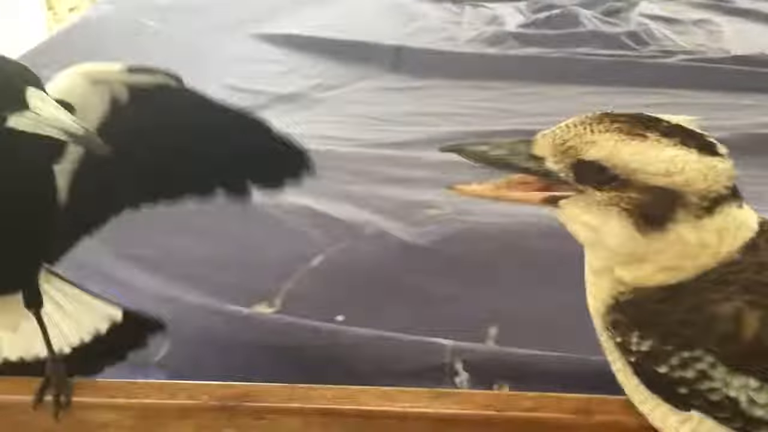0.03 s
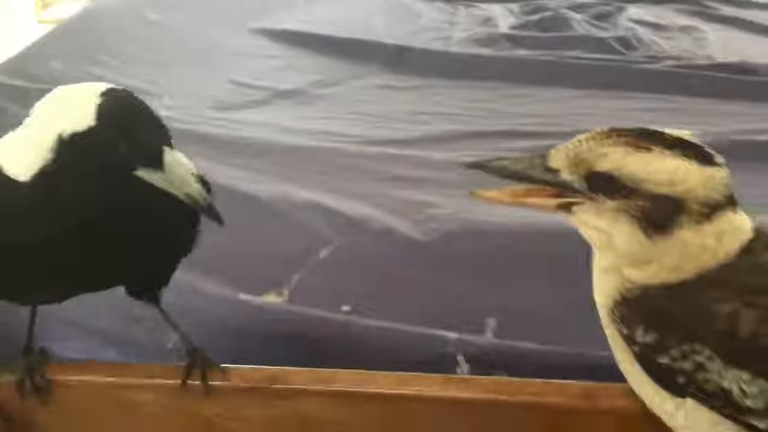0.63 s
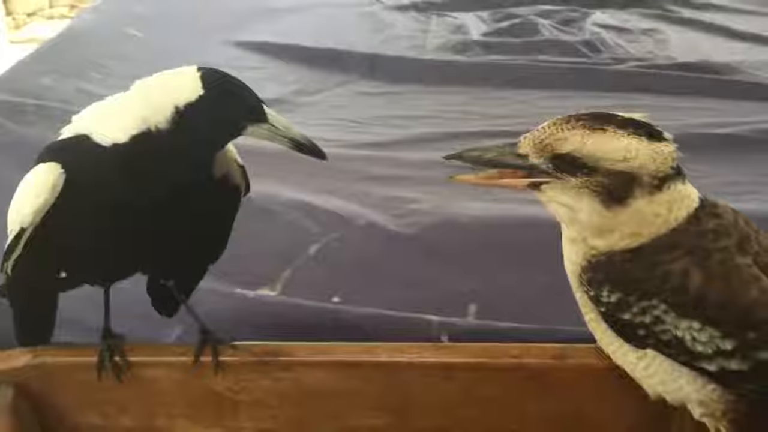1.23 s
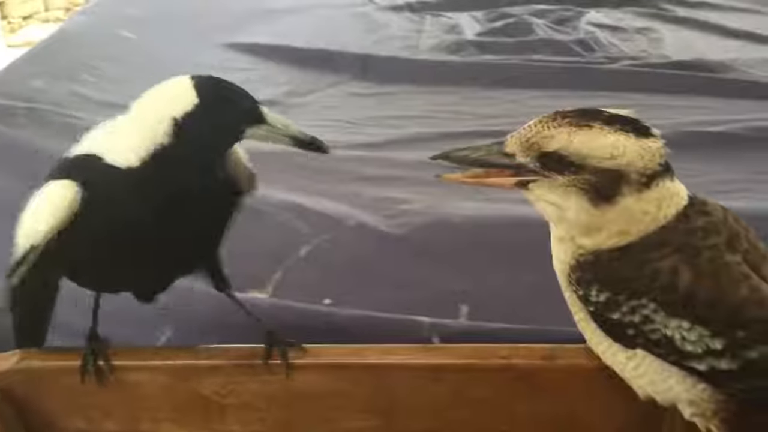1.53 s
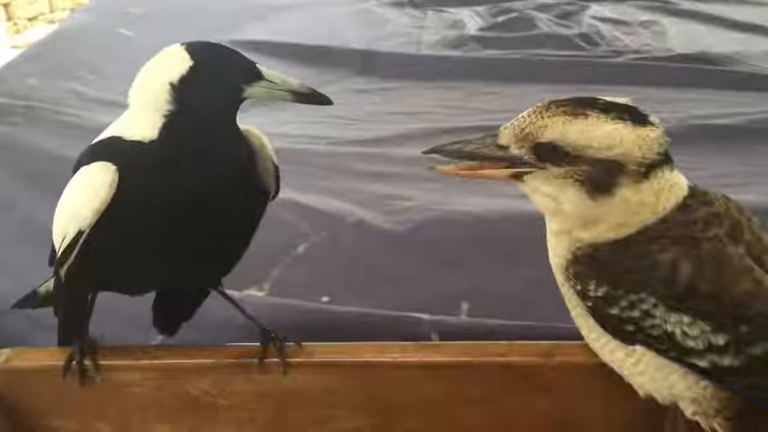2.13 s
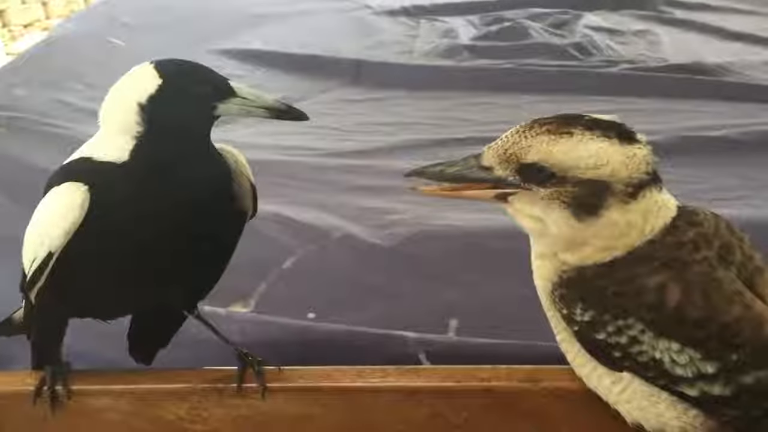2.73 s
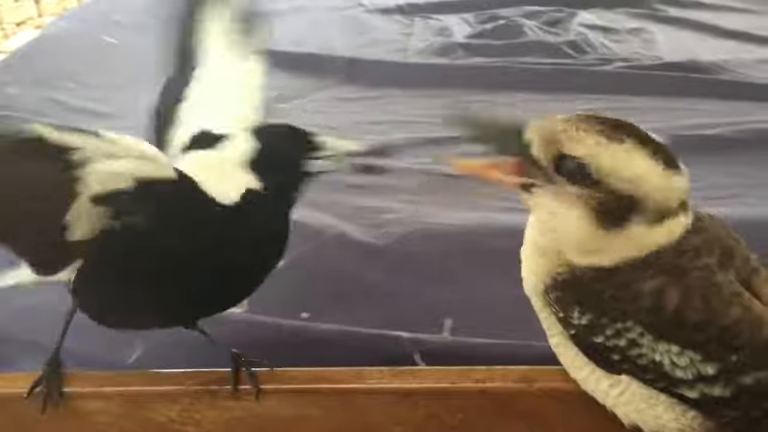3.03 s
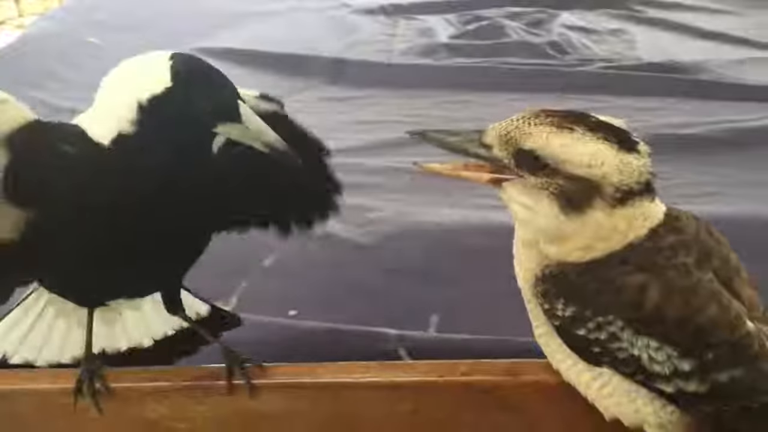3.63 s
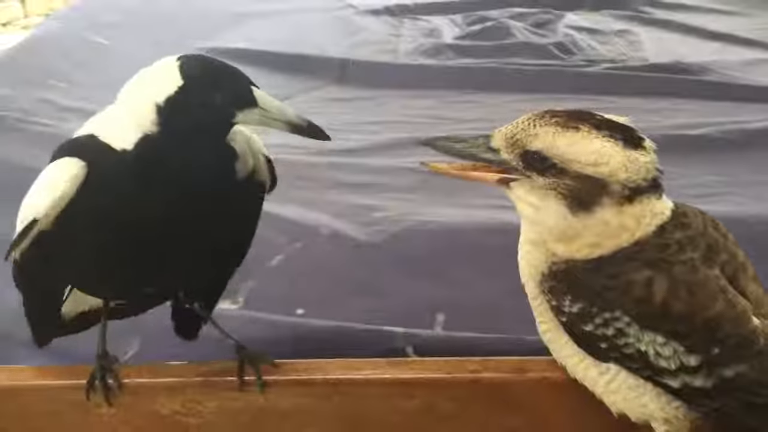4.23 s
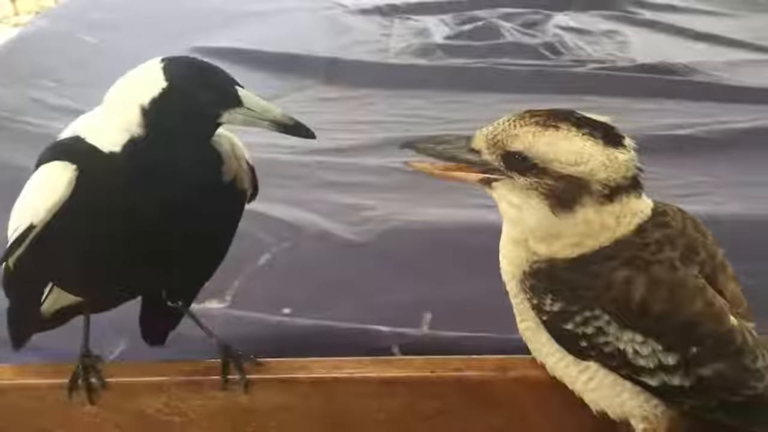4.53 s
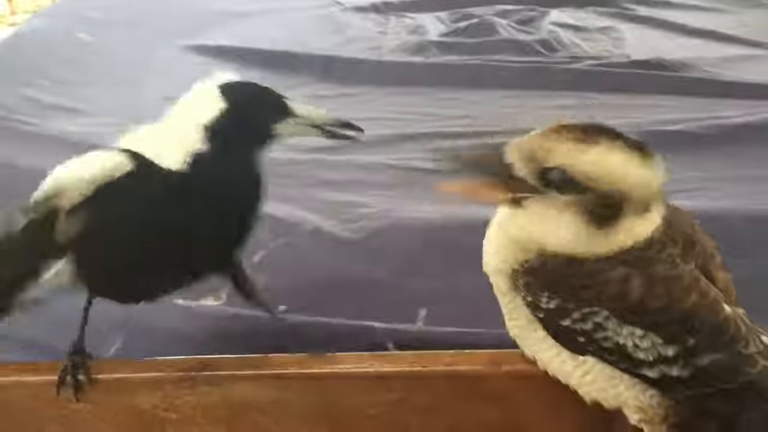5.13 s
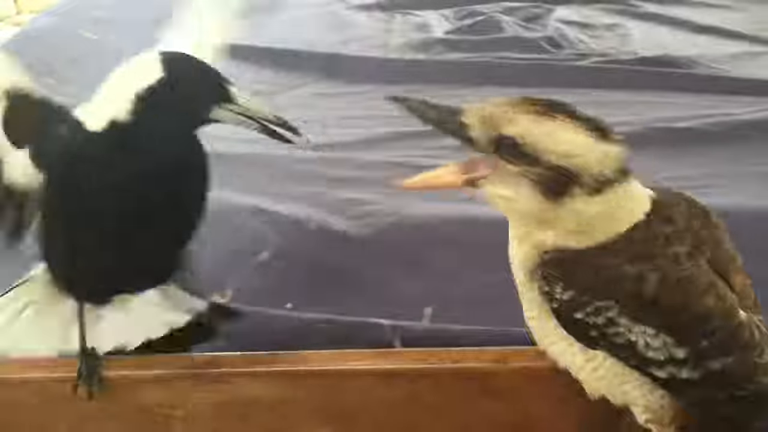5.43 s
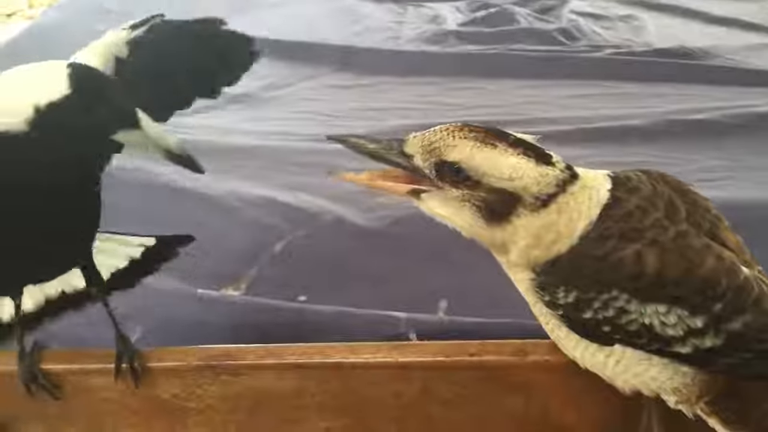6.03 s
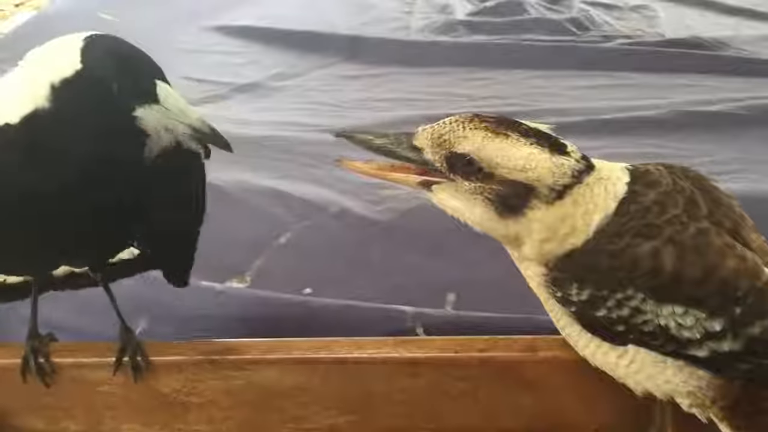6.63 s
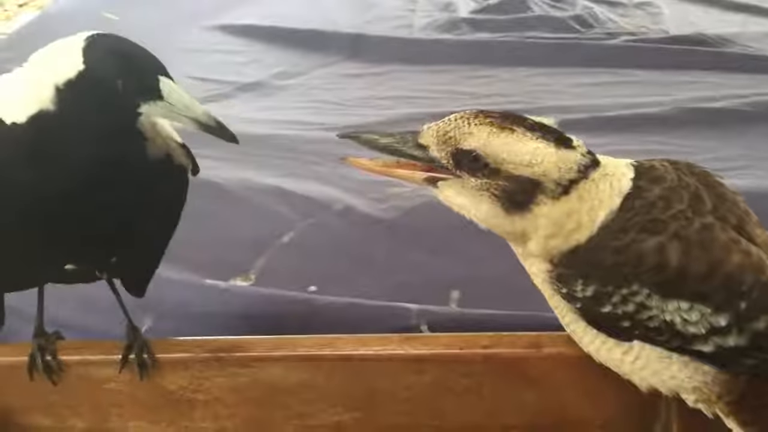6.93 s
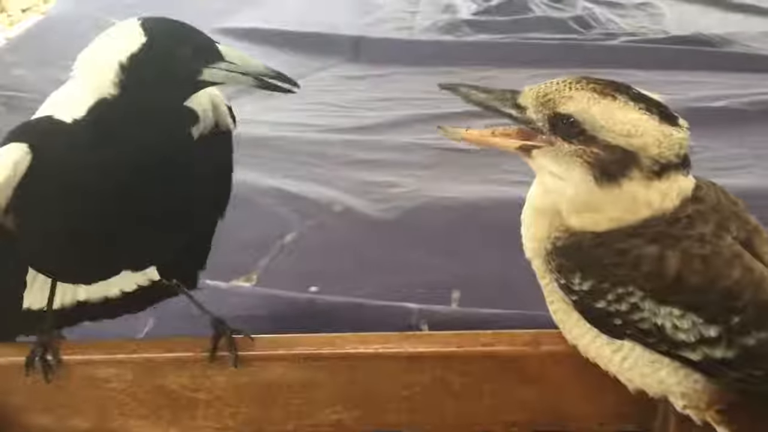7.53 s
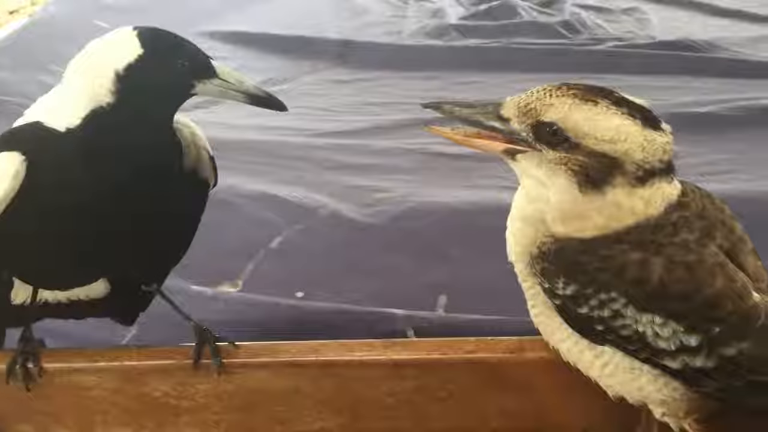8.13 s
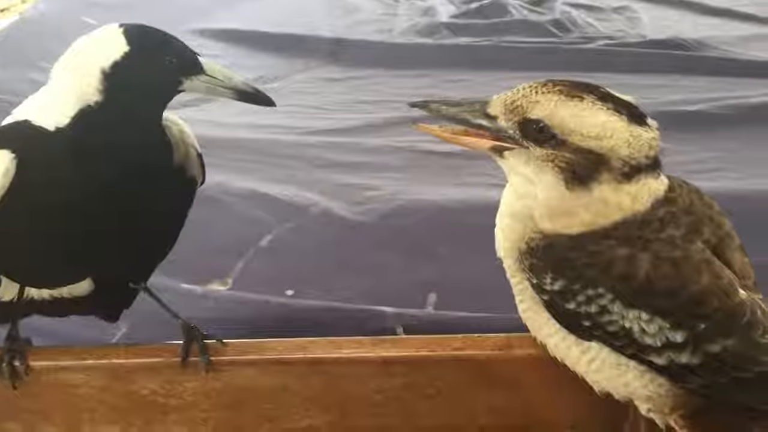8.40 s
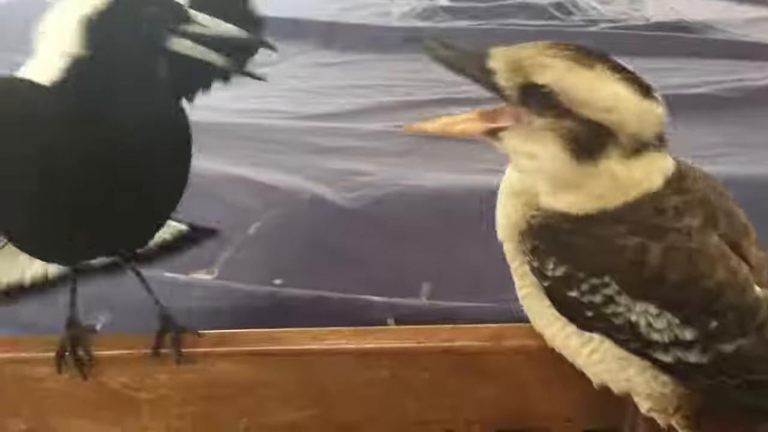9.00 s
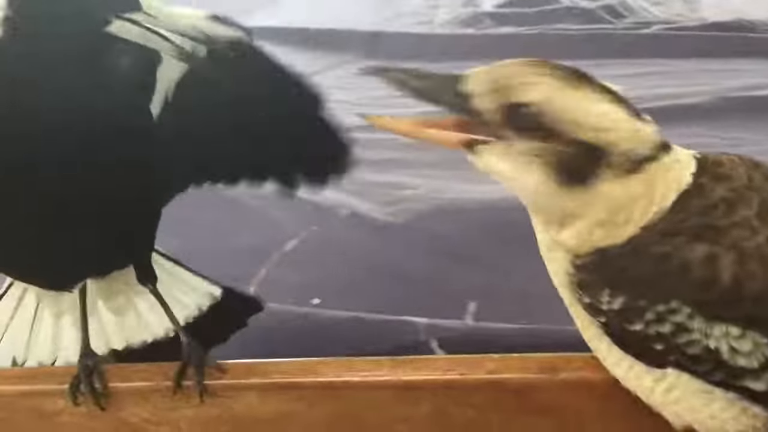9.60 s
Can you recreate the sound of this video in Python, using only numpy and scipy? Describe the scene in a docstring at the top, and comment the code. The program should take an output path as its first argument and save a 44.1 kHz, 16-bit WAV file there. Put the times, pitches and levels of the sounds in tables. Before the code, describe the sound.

A faint, low rumble of distant traffic runs throughout, with a far engine rising in pitch through four gears between about 1 and 9 seconds. Two tiny ticks of claws on wood come in the first second. Close by, a bird gives four short, harsh squawks at about 3.1, 5.2, 7.4 and 9.0 seconds, far louder than the background. Each lasts a fifth of a second: a fluttering buzz that cracks upward, then plunges. The third is slightly mellower. At 9.4 seconds a thin falling whistle follows, warbling at first and flicking up at its end. Light beak and claw clicks land near 3.5, 5.7, 7.3 and 8.9 seconds, with a few very faint wing rustles. A distant bird pipes softly three times. The near calls have a slight, short porch echo, and a low motor hum grows a little toward the end.

```python
"""Magpie squaring up to a kookaburra

On a wooden rail under a porch roof: four squawks (fluttering buzz, upward flip, hard plunge) and one
falling two-voiced whistle, made by syrinx membranes sounding through windpipe and beak. Beak and
claws tick, wings rustle. Far off, a bird pipes, traffic rumbles, an engine climbs through its gears."""
import sys
import numpy as np
from scipy import signal
from scipy.fft import rfft, irfft, next_fast_len
from scipy.io import wavfile
from scipy.ndimage import uniform_filter1d, map_coordinates

SR = 44100
rng = np.random.default_rng(int(sys.argv[2]) if len(sys.argv) > 2 else 0)


def waveform_to_disk(signal):
    """Save audio, clipped to [-1, 1], as 16-bit WAV at the path in sys.argv[1]."""
    frames = np.transpose(np.atleast_2d(signal))
    scaled = np.clip(frames, -1, 1) * 32767
    samples = np.round(scaled).astype(np.int16)
    wavfile.write(sys.argv[1], SR, samples)


N = 434826
TOP_HZ = 15720

# air in the throat: f/Hz, level/dB
BREATH = [(400, -42.5), (1000, -4.5), (2000, -15.5), (2750, 2), (4100, -5.5), (5100, -10), (6500, -4.5),
          (7400, -11), (9500, -12), (10400, -20.5), (11700, -14), (15500, -33.5)]
# feather and claw friction: f/Hz, level/dB
FRICTION = [(1000, -6), (3000, 4.5), (7000, 1.5), (13000, 0.5), (16000, -2.5)]
# one engine pull per gear: t/s, length/s, start rate/Hz, end rate/Hz, level/dB, swell/dB, tyre swell/dB
PULLS = [(0.9, 1.5, 21, 29, -55.5, 0, 0.5), (2.1, 1.7, 26.6, 33, -48.5, -2, 3),
         (4.4, 2.17, 21.2, 33.7, -45, 8, 6), (6.7, 2.3, 21.4, 29.2, -45, -5, 6)]


def amp(db):
    """Decibels to gain."""
    return 10 ** (np.asarray(db) / 20)


def unit(x):
    """Scale to rms 1."""
    return x / np.sqrt(np.mean(x ** 2) + 1e-20)


def along(points, hz):
    """Read (f/Hz, value) points on a log axis."""
    f, values = np.transpose(points)
    return np.interp(np.log(np.abs(hz) + 1), np.log(f + 1), values)


def wobble(rate_hz, size):
    """Smooth random curve, knots at rate_hz."""
    knots = rng.standard_normal(int(size * rate_hz / SR) + 4)
    return map_coordinates(knots, [np.arange(size) * rate_hz / SR], mode="nearest")


def edges(t, length_s, fade_s):
    """1 at both ends, falling to 0 within fade_s."""
    return np.maximum(1 - np.minimum(t, length_s - t) / fade_s, 0)


def phase_of(hz):
    """Running phase in radians."""
    return 2 * np.pi * np.cumsum(hz) / SR


def filtered(x, gain):
    """Apply gain(hz) to the spectrum."""
    size = next_fast_len(len(x) + 8192)
    return irfft(rfft(x, size) * gain(np.fft.rfftfreq(size, 1 / SR)), size)[:len(x)]


def noise(spectrum, size):
    """Coloured noise, rms 1."""
    return unit(filtered(rng.standard_normal(size), lambda hz: amp(along(spectrum, hz))))


def add(track, start_s, x):
    """Mix x in from start_s."""
    part = track[max(round(start_s * SR), 0):][:len(x)]
    part += x[:len(part)]


def syrinx(pitch_hz, slope_db, rasp_db, shimmer_db, purity_db, partials=14):
    """A membrane's overtones sweep through the throat's resonances; air hisses once a cycle."""
    # response of windpipe and open beak: f/Hz, gain/dB
    throat = [(300, -41.5), (560, -7.5), (1000, -6.5), (1600, 8), (2050, 1), (2520, -3), (2850, -18),
              (3400, -20.5), (4100, -11), (5000, -19.5), (6300, -16), (7300, -25.5), (9600, -22),
              (15000, -52.5)]
    size = len(pitch_hz)
    phase = phase_of(pitch_hz)
    k = np.arange(1, partials + 1)[:, None]
    tilt_db = slope_db * np.log2(np.maximum(k / 2, 1))
    gains = amp(along(throat, k * pitch_hz) + tilt_db) * (k * pitch_hz < TOP_HZ)
    gains[1:] *= amp(np.minimum(2200 - pitch_hz, 0) / 55 - purity_db)  # high register: thin overtones
    gains /= np.sqrt(np.sum(gains ** 2, axis=0) / 2)
    shimmer = amp(shimmer_db * np.minimum((k - 1) / 4, 1) * np.array([wobble(342, size) for _ in k]))
    tone = np.sum(gains * shimmer * np.sin(k * phase + rng.uniform(0, 2 * np.pi, k.shape)), axis=0)
    air_gain = amp(rasp_db)
    hiss = air_gain * noise(BREATH, size) * (1 + np.cos(phase) / 2)
    return (tone + hiss) / np.sqrt(1 + air_gain ** 2)


def squawk_gesture(attack_s, buzz_s, climb_s, low_hz, top_hz, ring_hz, fall_s,
                   buzz_db, swell_db, accent_db, plunge_db):
    """Pitch and level of a squawk: hold a low note, tighten to the top, catch, let go."""
    # membrane output, best with partial 1 or 2 on the windpipe resonance: f/Hz, gain/dB
    coupling = [(500, -27), (640, -7), (760, 0), (950, 1), (1100, -4), (1300, -4), (1600, -3.5), (1950, -1),
                (2100, -0.5), (2750, -13.5), (3300, -17.5)]
    turn_s, hold_s, plunge_s = .015, .007, .07
    bend_hz, break_hz, plunge_hz = 169.2, 2713, 2234
    catch_s = buzz_s + climb_s + turn_s
    t = np.arange(round((catch_s + plunge_s) * SR)) / SR
    since_s = np.maximum(t - catch_s, 0)
    stages = [t < buzz_s, t < catch_s]

    scoop_hz = 149.1 * np.exp(-t / .02)
    buzz_hz = low_hz + scoop_hz + bend_hz * np.exp(np.minimum(t - buzz_s, 0) / .013)
    flip_hz = np.interp(t, [buzz_s, buzz_s + climb_s, catch_s], [low_hz + bend_hz, top_hz, break_hz])
    # pitch sticks at the windpipe resonance until pulled past break_hz
    flip_hz = np.where(flip_hz < break_hz, np.minimum(flip_hz, ring_hz), flip_hz)
    fall_hz = np.where(since_s < hold_s, ring_hz, plunge_hz * np.exp(-since_s / fall_s))
    pitch_hz = np.select(stages, [buzz_hz, flip_hz], fall_hz)

    onset_db = 15 * np.maximum(1 - (t / attack_s) ** 2, 0)
    low_db = buzz_db + swell_db * t / buzz_s - onset_db + .8 * wobble(120, len(t))
    full_db = plunge_db + along(coupling, pitch_hz)
    climb_db = full_db - 5 * (pitch_hz < break_hz)
    catch_db = accent_db * np.exp(-(since_s / .009) ** 2)
    tear_db = 1.5 * (since_s > hold_s) * wobble(450, len(t))
    db = np.select(stages, [low_db, climb_db], full_db + catch_db + tear_db)
    return t, uniform_filter1d(pitch_hz, size=90), uniform_filter1d(db, size=70), ring_hz


def squawk(t, pitch_hz, db, ring_hz, mellow_db, flutter_hz=152, swing=.11, throb_db=4, crack_db=18):
    """A low note flutters, cracks up through a weak high register, then plunges at full force."""
    buzzing = np.clip((1600 - np.maximum.accumulate(pitch_hz)) / 350, 0, 1)
    rising = (1 - buzzing) * (t < t[np.argmax(pitch_hz)])
    cracked = np.clip((pitch_hz - 2200) / 600, 0, 1)  # the membrane loses its grip
    effort_db = np.clip(db + 18.5, -8, 5)  # harder push: brighter, harsher
    beat = phase_of(flutter_hz * (1 + .023 * wobble(54, len(t))))
    jitter = (.017 * (1 - .5 * buzzing) + .0504 * cracked) * wobble(900, len(t))
    pitch_hz = pitch_hz * (1 + swing * buzzing * np.cos(beat) + jitter)
    flutter_db = buzzing * (throb_db * np.cos(beat + 2.62) - .8)  # loudest near the bottom of a swing
    slope_db = -4.6 + .78 * np.maximum(effort_db, 0) - .5 * mellow_db
    rasp_db = -20 + .4 * effort_db - 3.5 * buzzing + crack_db * cracked - .34 * mellow_db
    purity_db = -.4 * np.minimum(effort_db, 0) + 4 * rising + (1.44 * mellow_db - 1.5) * buzzing
    voice = syrinx(pitch_hz, slope_db, rasp_db, shimmer_db=2 - 2.2 * buzzing, purity_db=purity_db)
    windpipe = np.sin(2 * np.pi * ring_hz * t + .88 * wobble(300, len(t)))
    return amp(db + flutter_db) * (voice * (1 - .25 * cracked) + .8 * cracked * windpipe)


def whistle(start_hz=2317, flick_hz=1010, flick_at_s=9.674, flick_s=.00586, hitch_hz=109, hitch_s=.004):
    """One side of the syrinx: a near-pure note sags ever faster, hitches, and flicks up at the end."""
    # envelope: t/s, level/dB
    envelope = [(9.38, -34), (9.388, -29.5), (9.468, -19), (9.524, -19.5), (9.534, -24.5), (9.632, -21),
                (9.658, -15.5), (9.7, -41.5)]
    # chokes with a jump in pitch: t/s, level change/dB
    chokes = [(9.407, -6), (9.536, 1.5), (9.572, -5.5), (9.611, -7)]
    t = np.arange(round(envelope[0][0] * SR), round(envelope[-1][0] * SR)) / SR
    age_s = t - t[0]
    flick = (1 + np.tanh((t - flick_at_s) / (2 * flick_s))) / 2
    choke_s, choke_db = np.transpose(chokes)
    hitches = np.exp(-((t - choke_s[:, None]) / hitch_s) ** 2)
    sag_hz = 900 * age_s + 3500 * age_s ** 2
    pitch_hz = start_hz - sag_hz + flick_hz * flick + hitch_hz * hitches.sum(0)
    pitch_hz *= 1 + (.0029 + .015 * flick) * wobble(252, len(t))
    db = np.interp(t, *np.transpose(envelope)) + choke_db @ hitches - 3 * flick
    db += 1.5 * wobble(171.7, len(t)) - 22 * edges(age_s, age_s[-1], fade_s=.0056)
    rasp_db = -41.5 + 13 * (hitches.sum(0) + flick)
    voice = syrinx(pitch_hz, slope_db=-20, rasp_db=rasp_db, shimmer_db=6.5, purity_db=3.5)
    out = np.zeros(N)
    add(out, t[0], amp(db) * voice)
    return out


def warble(start_s=9.36, length_s=.116, centre_hz=3005, swing_hz=550, rate_hz=38.6):
    """The other side of the syrinx swings quickly in pitch above the whistle."""
    t = np.arange(round(length_s * SR)) / SR
    swing = np.cos(2 * np.pi * rate_hz * t)
    phase = phase_of(centre_hz + swing_hz * swing + 80 * wobble(600, len(t)))
    db = -33.5 - 14 * edges(t, length_s, fade_s=.016)
    db += 3 * wobble(230, len(t)) - 2.5 * swing  # weaker away from the throat resonance
    tone = np.sqrt(2) * np.sin(phase) + amp(-14) * np.sin(2 * phase)
    out = np.zeros(N)
    add(out, start_s, amp(db) * (tone + amp(-15.5) * noise(BREATH, len(t))))
    return out


def two_voices():
    """Both sides of the syrinx share one air stream, which adds sum tones."""
    lower, upper = whistle(), warble()
    return lower + upper + filtered(1.5 * lower * upper, lambda hz: hz > 4000)


def ticks(attack_s=.0007):
    """Beak and claws strike wood: a brief ring with some scrape."""
    # strikes: t/s, level/dB, f/Hz, t60/s, scrape gain
    strikes = [(0.543, -46.5, 6500, 0.046, .12), (0.714, -50, 6800, .05, .12),
               (3.511, -34.5, 3560, .03, .1), (3.574, -48.5, 3850, 0.11, .1),
               (3.698, -51, 9430, 0.058, .32), (5.6765, -35, 3730, .04, .32), (5.772, -41, 2870, .07, .32),
               (7.32, -45, 2900, .05, .32), (8.920, -35, 3650, .034, .38)]
    out = np.zeros(N)
    t = np.arange(SR // 5) / SR
    for start_s, db, hz, t60_s, scrape in strikes:
        tick = .36 * np.sin(2 * np.pi * hz * t) + scrape * noise(FRICTION, len(t))
        add(out, start_s, amp(db - 60 * t / t60_s) * tick * (1 - np.exp(-t / attack_s)))
    return out


def wings():
    """Feathers brush past each other in short strokes."""
    # strokes: t/s, half length/s, level/dB
    strokes = [(0.737, .04, -66.5), (1.627, .012, -66.5), (2.916, 0.019, -63), (5.604, .07, -58),
               (5.733, .06, -63), (7.342, .03, -62)]
    t = np.arange(N) / SR
    envelope = sum(amp(db) * np.exp(-((t - at_s) / half_s) ** 2) for at_s, half_s, db in strokes)
    return envelope * unit(noise(FRICTION, N) * amp(4 * wobble(250, N)))


def porch(x, early_db=-19, tail_db=-17, echoes=8, build_s=.0071):
    """Near surfaces add a few weak echoes and a short diffuse tail."""
    # reverberation time: f/Hz, t60/s
    decay = [(300, 0.12), (1800, 0.31), (4000, 0.28), (8000, .27), (15000, 0.038)]
    hz, t, spectra = signal.stft(rng.standard_normal(SR // 2), SR, nperseg=256)
    tail = signal.istft(spectra * amp(-60 * t / along(decay, hz)[:, None]), SR, nperseg=256)[1]
    tail *= 1 - np.exp(-np.arange(len(tail)) / SR / build_s)
    signs = rng.choice([-1, 1], echoes)
    delays_s = rng.uniform(.002, .025, echoes)
    early = np.zeros(len(tail))
    early[(delays_s * SR).astype(int)] = signs / np.sqrt(echoes)
    response = amp(early_db) * early + amp(tail_db) * tail / np.linalg.norm(tail)
    return x + signal.fftconvolve(x, response)[:N]


def far_bird(half_s=.063):
    """Soft wavering pipes, blurred by distance."""
    # notes: t/s, f/Hz, level/dB
    notes = [(2.77, 2260, -57.5), (6.88, 2290, -60), (8.45, 2270, -61.5)]
    t = np.arange(N) / SR
    drift = phase_of(55 * wobble(160, N))
    pipes = sum(amp(db) * np.exp(-((t - at_s) / half_s) ** 2) * np.sin(2 * np.pi * hz * t + drift)
                for at_s, hz, db in notes)
    return pipes * amp(4.3 * wobble(90, N))


def traffic(bump_s=1.79):
    """Distant traffic rumbles, with one dull bump."""
    # rumble envelope: t/s, level/dB
    envelope = [(0, -53), (1.7, -50), (3, -49.5), (4.1, -49.5), (5.7, -46.5), (8.2, -47), (9.4, -51)]
    # rumble spectrum: f/Hz, level/dB
    rumble = [(20, -37), (40, -14), (62, -5.5), (80, 0.5), (125, -2), (195, -1), (240, -8.5), (330, -34),
              (600, -51)]
    t = np.arange(N) / SR
    bump_db = 8 * np.exp(-((t - bump_s) / .05) ** 2)
    db = np.interp(t, *np.transpose(envelope)) + bump_db + 2 * wobble(7.6, N)
    return amp(db) * noise(rumble, N)


def tyres(peak_share=.59, width_share=.42):
    """Road noise swells with each engine pull; a faint hiss follows it weakly."""
    # tyres on the road: f/Hz, level/dB
    road = [(150, -31.5), (290, 3.5), (430, -1), (720, 1), (1000, -2), (1400, -16), (2500, -46.5)]
    # outdoor hiss: f/Hz, level/dB
    hiss = [(600, -2.5), (1300, 4), (2200, -0.5), (4000, -7.5), (6000, -10.5), (9500, -17), (10500, -23),
            (15500, -29)]
    t = np.arange(N) / SR
    db = -60.5
    for start_s, length_s, *_, swell_db in PULLS:
        progress = (t - start_s) / length_s
        db += swell_db * np.exp(-((progress - peak_share) / width_share) ** 2)
    roar = amp(db + 4 + 1.41 * wobble(6, N)) * noise(road, N)
    return roar + amp(.6 * db - 27) * noise(hiss, N)


def idling_motor(hum_hz=78):
    """An unsteady hum, growing toward the end."""
    # hum envelope: t/s, level/dB
    envelope = [(0, -60.5), (7.5, -54), (9, -45.5), (9.86, -43)]
    db = np.interp(np.arange(N) / SR, *np.transpose(envelope)) + 1.5 * wobble(4.6, N)
    return amp(db) * np.sin(phase_of(hum_hz + .5 * wobble(2.4, N)))


def engine(throttle_s=.5, throttle_db=12):
    """Speed rises steadily in each gear; the orders slide through the exhaust's resonances."""
    # engine orders: multiple of the cycle rate, level/dB
    orders = [(3, -6), (4, -0.5), (5, 2), (7, 1), (9, 1), (11, -0.5), (12, 2), (14, -4), (16, -6.5)]
    # exhaust response: f/Hz, gain/dB
    exhaust = [(60, -10.5), (95, -4), (118, 2.5), (150, -7), (185, 1.5), (230, -14), (330, -13), (400, -15),
               (520, -5.5)]
    out = np.zeros(N)
    for start_s, length_s, first_hz, last_hz, level_db, swell_db, _ in PULLS:
        t = np.arange(round(length_s * SR)) / SR
        cycle_hz = first_hz + (last_hz - first_hz) * t / length_s
        db = level_db + swell_db * (t / length_s - .5) - throttle_db * edges(t, length_s, throttle_s)
        phase = phase_of(cycle_hz * (1 + .005 * wobble(14, len(t))))
        for k, order_db in orders:
            fading_db = 2.5 * wobble(7, len(t))  # on the way over the houses
            gain = amp(db + order_db + along(exhaust, k * cycle_hz) + fading_db)
            add(out, start_s, gain * np.sin(k * phase + rng.uniform(0, 2 * np.pi)))
    return out


def scene():
    """Birds under the roof, street beyond; mono."""
    # squawks: t/s, attack/s, buzz/s, climb/s, low pitch/Hz, top pitch/Hz, windpipe resonance/Hz,
    # plunge time constant/s, buzz/dB, buzz swell/dB, catch accent/dB, plunge/dB, mellowness/dB
    calls = [(3.124, 0.016, .086, .025, 1020, 3140, 2078, 0.045, -17, -2.5, -4, -15, 1.2),
             (5.194, 0.022, 0.094, 0.029, 1017, 3150, 2085, .043, -22.5, 3.5, 1, -13, 1),
             (7.376, 0.018, .085, .026, 1018, 3550, 1924, .041, -27.5, 4, -1, -14, 4.5),
             (9.011, 0.013, 0.086, .022, 1059, 3100, 2095, .042, -23, 5, 0, -13.5, 1.2)]
    birds = two_voices() + ticks() + wings()
    for start_s, *shape, mellow_db in calls:
        add(birds, start_s, squawk(*squawk_gesture(*shape), mellow_db))
    return (porch(birds) + far_bird() + traffic() + tyres() + idling_motor() + engine())[None]


def record(dry):
    """The phone's band limit: nothing above TOP_HZ."""
    return np.array([filtered(x, lambda hz: hz < TOP_HZ) for x in dry])


dry = scene()
out = record(dry)
waveform_to_disk(out)
```